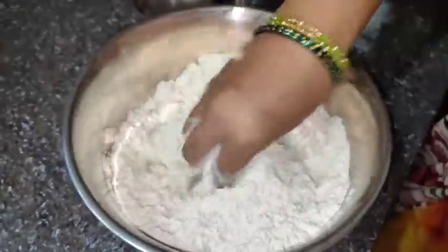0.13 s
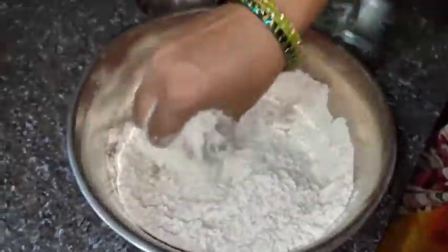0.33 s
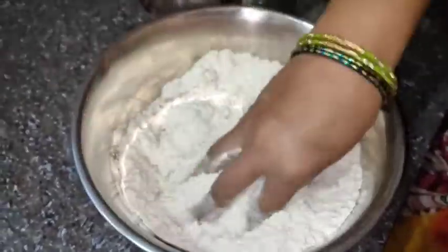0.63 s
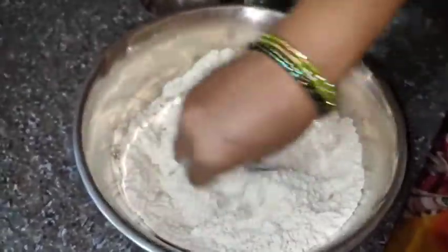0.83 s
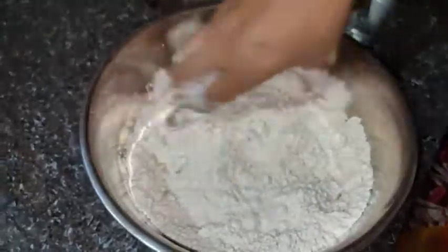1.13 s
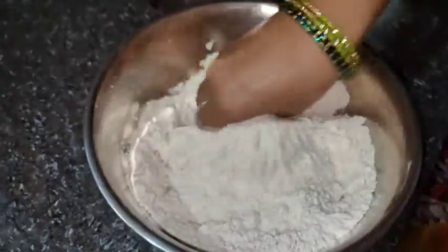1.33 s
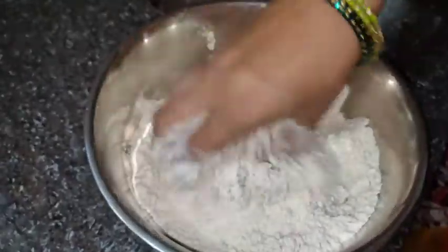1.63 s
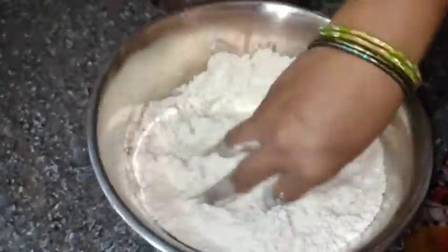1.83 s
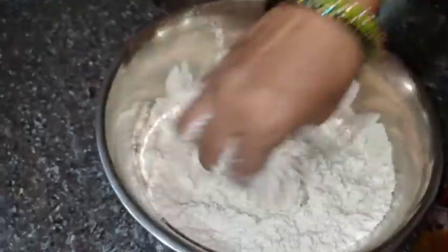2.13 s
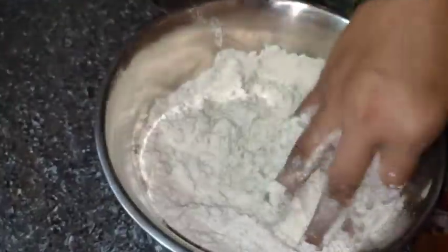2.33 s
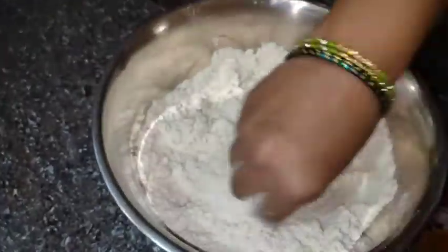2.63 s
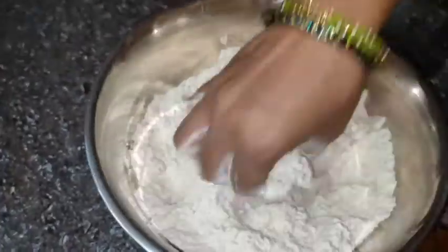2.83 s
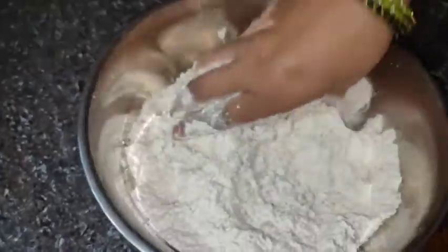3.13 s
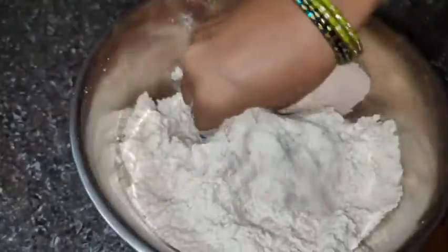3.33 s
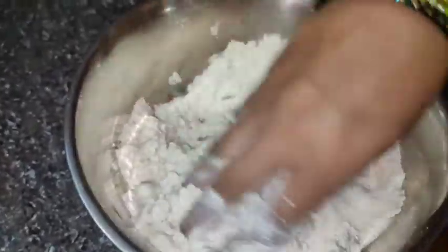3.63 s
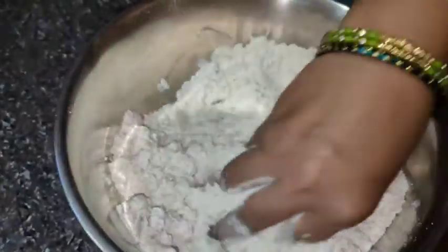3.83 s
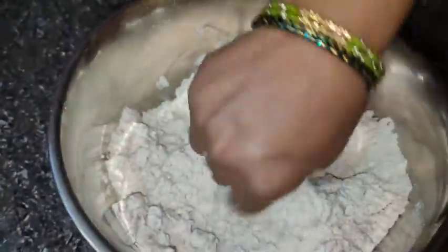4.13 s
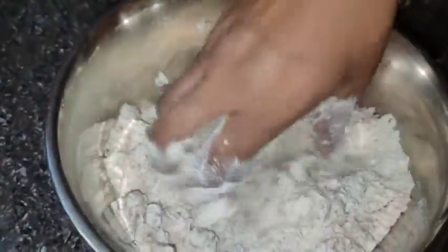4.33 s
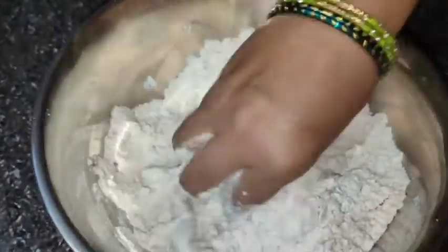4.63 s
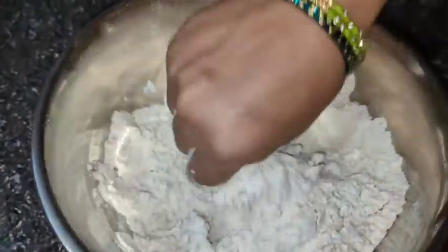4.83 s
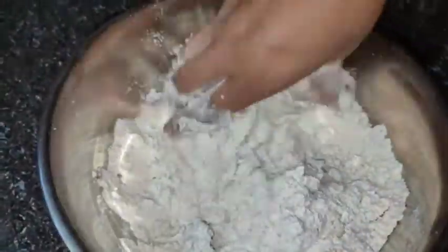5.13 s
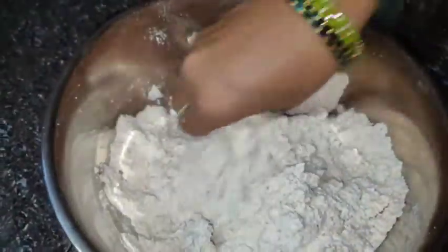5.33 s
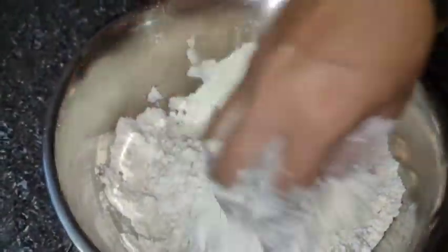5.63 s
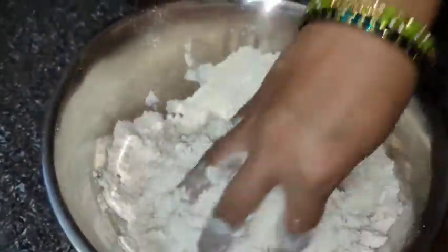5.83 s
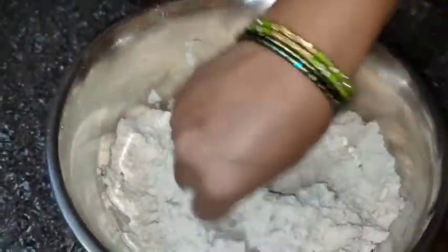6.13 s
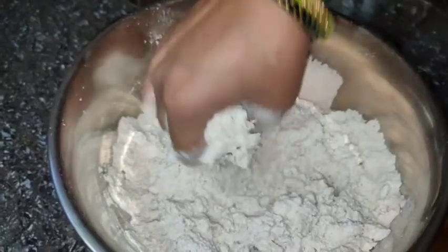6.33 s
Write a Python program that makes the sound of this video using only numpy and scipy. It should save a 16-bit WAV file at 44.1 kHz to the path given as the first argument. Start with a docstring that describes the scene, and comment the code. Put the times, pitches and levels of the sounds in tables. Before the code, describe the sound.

A hand works dry flour in a steel bowl, making a faint rustle with each stroke. Every so often glass bangles on the wrist clink together and knock the rim in short, bright rattles that ring briefly, some with a soft thud on the bowl bottom. The loudest come near the middle. A fan hums low throughout, and a bird chirps faintly outside once. The microphone is close, in a hard-walled kitchen.

```python
"""Glass bangles clash on a wrist and knock the rim of a steel bowl as a hand kneads flour in it.
Each clash is a short rattle that rings the bangles and the bowl and fades in a hard kitchen.
The hand thuds softly on the bowl bottom, and the flour rustles with each stroke.
Behind it a fan hums on the orders of its shaft and a bird chirps faintly outside,
all heard through the two ports of a phone close to the bowl."""
import sys
import numpy as np
from scipy import signal
from scipy.fft import rfft, irfft
from scipy.io import wavfile
from scipy.ndimage import uniform_filter1d

SR = 44100
rng = np.random.default_rng(int(sys.argv[2]) if len(sys.argv) > 2 else 0)


def put_to_file(sound):
    """Save the sound as 16-bit audio at rate SR, in the file named by the first command-line argument."""
    columns = np.atleast_2d(sound).T  # one column per channel
    safe = np.clip(columns, -1, 1)
    whole_steps = np.round(safe * 32767)
    wavfile.write(sys.argv[1], SR, whole_steps.astype(np.int16))


N = 285581
T = np.arange(N) / SR
HZ = np.arange(N // 2 + 1) * SR / N


def clashes(tap_count=5, rattle_s=.004, bounce_s=.005, scatter_db=3.5):
    """Glass hits glass and steel in a few fading taps, each waking the modes in a new mix."""
    # clashes: t/s, relative level/dB, favoured bangle f/Hz, bowl trim/dB, favoured bowl f/Hz,
    # knock trim/dB, favoured knock f/Hz
    hits = [(0.6263, -30, 6400, -23.5, 2440, -12.5, 2050), (.645, -30, 6420, -25.5, 3850, -12, 1500),
            (1.226, -19, 6560, -24.5, 3930, -22, 1400), (1.243, -23, 6200, -21.5, 4480, -21, 1000),
            (1.256, -27, 6000, -17, 3900, -29.5, 1000), (1.273, -35.5, 6800, -18, 3500, -30.5, 900),
            (1.292, -43.5, 6170, -13, 3460, -26, 900), (2.298, -52, 6230, -34, 2640, -31, 800),
            (2.4089, -14, 6880, -19, 4220, -20.5, 1220), (2.4161, -15.5, 6060, -17.5, 3270, -22, 780),
            (2.44, -27, 6730, -14, 3930, -19.5, 720), (2.453, -30, 6940, -14, 4850, -28, 470),
            (2.465, -29, 5840, -19, 3930, -18, 480), (2.485, -21, 6060, -18.5, 3760, -26.5, 680),
            (2.525, -30, 6530, -20, 3930, -16.5, 624), (2.58, -37.5, 6250, -20, 3160, -27, 663),
            (2.622, -36.5, 7650, -16, 3830, -23, 490), (3.036, -48.5, 6340, -31, 4900, -27, 770),
            (3.1057, -14.5, 6020, -22.5, 4400, -21, 880), (3.113, -22, 6200, -26.5, 4330, -15, 800),
            (3.14, -39.5, 6380, -15, 3100, -19, 482), (3.171, -40.5, 6200, -15, 4030, -26, 880),
            (3.199, -40, 6300, -15, 3900, -25.5, 472), (3.249, -50, 7200, -12, 4400, -37, 490),
            (3.7444, -27, 6530, -14.5, 4280, -14.5, 688), (3.755, -33, 7400, -20.5, 4360, -13, 1570),
            (3.773, -42, 6300, -10, 4280, -2.5, 1490), (5.053, -61.5, 7400, -22, 2800, -25, 800),
            (5.086, -54.5, 7500, -31, 3080, -27, 790), (5.1952, -21.5, 6580, -16, 3990, -19.5, 1100),
            (5.2352, -28.5, 5830, -11.5, 2520, -17.5, 1200), (5.28, -52.5, 6170, -9, 4580, -33, 900)]
    # modes of the glass bangles: f/Hz, level/dB, t60/s
    bangle_modes = [(5455, -22, 0.02), (5870, -12.5, 0.011), (5822, -0.5, 0.022), (5870, -5.5, 0.028),
                    (6100, -0.5, 0.051), (6360, -12, 0.066), (6725, -4.5, 0.018), (6560, -5, .05),
                    (6700, -18, 0.01), (6470, -1, 0.027), (7280, -3, 0.043), (7500, -4.5, 0.022),
                    (7420, -1, 0.045), (6900, 4, .03), (7480, 0.5, 0.024), (7487, 2, 0.041),
                    (8090, -2, 0.019), (7500, -8, 0.028), (8770, -14.5, 0.0085)]
    # bright modes of the steel bowl: f/Hz, level/dB, t60/s
    bowl_modes = [(2640, -3, .12), (2767, -3, .12), (2930, -9, .08), (3106, -2, .16), (3155, -4, .14),
                  (3330, -12, .05), (3510, -6, .11), (3630, -9, .08), (3760, -12, .05), (3932, -3, .12),
                  (4060, -10, .06), (4225, -3, .18), (4320, -8, .09), (4445, -4, .16), (4645, -5, .15),
                  (4840, -5, .14), (4985, -9, .08), (5250, -11, .05)]
    # the bowl's low, flour-damped modes: f/Hz, level/dB, t60/s
    knock_modes = [(442, 2.5, 0.037), (742, 3.5, 0.016), (802, -6, .03), (976, 0, 0.023), (1160, -4, 0.018),
                   (1510, -4, 0.02), (1834, -7, 0.013), (2220, -4, 0.013)]
    # every clash bounces once, softer and leaning more on the bowl
    bounces = np.array(hits) + [bounce_s, -4.5, 0, 2.5, 0, 0, 0]
    bounces[:, 0] += .4 * bounce_s * rng.standard_normal(len(hits))
    start, hit_db, glass_hz, bowl_db, bowl_hz, knock_db, knock_hz = np.concatenate([hits, bounces]).T
    lateness = np.cumsum(rng.exponential(1, (len(start), tap_count)), axis=1)
    lateness = (lateness - lateness[:, :1]) / tap_count
    at = ((start[:, None] + lateness * rattle_s) * SR).astype(int)
    force = undb(hit_db[:, None] - 10.7 * lateness - 13.5)

    def strike(modes, favoured_hz, trim_db, width_oct, boost_db):
        """Each tap shares its energy among the modes; those near the favoured pitch ring most."""
        draws = rng.standard_normal((len(start), len(modes), tap_count, 4))
        scatter, phase, *port_phases = draws.transpose(3, 1, 0, 2)
        detune = np.log2(np.array(modes)[:, :1] / favoured_hz) / width_oct
        share = undb(scatter_db * scatter + boost_db * np.exp(-detune ** 2)[:, :, None])
        share /= np.sqrt(np.mean(share ** 2, axis=0))
        strength = force * undb(trim_db)[..., None] * share
        # a mode radiates unevenly, so each port hears it with its own phase
        gains = [strength * np.exp(9j * phase + 1.2j * own) for own in port_phases]
        return ring(modes, at, np.stack(gains, 1))

    polarity = rng.choice([-1., 1.], (len(start), tap_count, 2))
    contact = np.array([taps(at, force * polarity[..., port]) for port in range(2)])
    crack = undb(16.5) * band(band(contact, 5900, 2200), 5900, 2600)
    crack += undb(-9) * band(band(contact, 3800, 2500), 3800, 3000)
    knock = strike(knock_modes, knock_hz, knock_db + 7.5, width_oct=.4, boost_db=11)
    glass = strike(bangle_modes, glass_hz, 0, width_oct=.1, boost_db=9.5)
    steel = strike(bowl_modes, bowl_hz, bowl_db + 3.5, width_oct=.11, boost_db=11.5)
    return glass + steel + crack + band(knock, 1100, 2500)


def ring(modes, at, gains):
    """Taps ring each mode as a dying sine; gains has shape (modes, ports, clashes, taps)."""
    out = np.zeros((2, N))
    for (hz, db, t60), gain in zip(modes, gains):
        pole = np.exp(2j * np.pi * hz / SR - np.log(1000) / (t60 * SR))
        for port in range(2):
            out[port] += undb(db) * signal.lfilter([1], [1, -pole], taps(at, gain[port])).imag
    return out


def thuds():
    """Soft pushes ring the bowl bottom and the counter for a moment."""
    # blows of the hand on the bowl bottom: t/s, relative level/dB
    blows = [(1.235, -56), (2.413, -38.5), (2.472, -44.5), (3.106, -34.5), (3.748, -47), (4.467, -42),
             (4.477, -43)]
    start, db = np.transpose(blows)
    impulses = taps((start * SR).astype(int), undb(db + 11.5))
    push = np.convolve(impulses, np.hanning(70))[:N]
    return band(push, 185, 70.1) + undb(-3) * band(push, 300, 150) + undb(-4) * band(push, 45, 54)


def flour():
    """Dense grains slide on steel: a fine hiss and a coarser rustle, each with a quick flicker."""
    # strokes of the hand through the flour: t/s, length/s, hiss level/dB, rustle level/dB
    strokes = [(-.05, 0.45, -64.5, -67.5), (0.17, 0.16, -89, -72), (0.326, 0.24, -70.5, -67.5),
               (0.519, 0.31, -61.5, -67), (0.798, 0.35, -68, -66), (1.07, 0.58, -66, -79),
               (1.572, 0.22, -69, -85), (1.776, 0.24, -66, -80), (2.064, 0.13, -77, -91),
               (2.282, .6, -62, -78.5), (3.02, 0.44, -61, -71.5), (3.579, 0.55, -67.5, -75),
               (4.075, 0.3, -77.5, -75.5), (4.31, 0.46, -69, -79.5), (4.542, 0.28, -68.5, -79),
               (4.863, 0.15, -75.5, -92), (5.049, 0.49, -64, -81.5), (5.784, 0.4, -67.5, -80),
               (6.22, .18, -74, -92), (6.41, .15, -73, -95)]
    resting = undb([-86, -88])[:, None]
    kneading = sum(undb(db)[:, None] * swell(start, length, rise=.22, fall_db=15.5)
                   for start, length, *db in strokes)
    hiss_gain, rustle_gain = resting + kneading
    grains = rng.standard_normal((2, 2, N)) * undb(2 * rng.exponential(1, (2, 2, N)))
    hiss = signal.sosfilt(signal.butter(3, [5950, 8100], "band", fs=SR, output="sos"), grains[0])
    hiss = level(hiss, 0) * hiss_gain * undb(.83 * walk(12))
    rustle = band(band(grains[1], 2300, 1300), 3100, 2200)
    rustle = level(rustle, 0) * rustle_gain * undb(2.1 * walk(26))
    return hiss + rustle


def kitchen(x, t60_s=.41, echo_db=-3.5):
    """Dense echoes off hard walls, unrelated at the two ports."""
    t = T[:int(.7 * SR)]
    tail = rng.standard_normal((2, len(t))) * undb(-60 * t / t60_s) * (1 - np.exp(-t / .002))
    tail /= np.sqrt(np.sum(tail[0] ** 2))
    return undb(echo_db) * signal.fftconvolve(x, tail, axes=1)[:, :N]


def fan(shaft_hz=11.068, blades=4, left_lag_samples=13):
    """The shaft hums on its wavering orders, over rushing air and a ringing housing."""
    # partials of the hum: multiple of the shaft rate, level/dB
    orders = [(6, -70), (8, -62), (10, -52.5), (11, -66), (12, -64.5), (14, -63.5), (16, -82.5),
              (17, -59.5), (18, -75.5), (19, -77), (21, -73.5), (26, -67.5), (29, -69), (30, -68),
              (32, -60.5), (35, -74), (39, -78.5), (40, -73.5), (42, -75), (44, -67.5), (46, -74.5),
              (48, -70.5), (50, -71), (56, -73)]
    # slow rise and fall of the hum: t/s, relative level/dB
    contour = [(0.0, -55.5), (1.8, -55.5), (2.299, -56), (2.63, -53), (2.901, -57), (3.209, -51.5),
               (3.49, -57), (3.87, -54.5), (4.29, -56.5), (4.5, -55.5), (6.47, -55.5)]
    times, contour_db = np.transpose(contour)
    angle = 2 * np.pi * shaft_hz * T + .016 * walk(1.5)
    hum = sum(undb(db + walk(3.7)) * np.cos(k * angle + .02025 * k ** 2) for k, db in orders)
    hum *= undb(np.interp(T, times, contour_db - contour_db.mean()))
    left, right = hum + fan_air(blades * angle) + fan_housing()
    return np.array([np.roll(left, left_lag_samples), right])


def fan_air(blade_phase):
    """Air rushes from the fan, and each blade pushes a puff."""
    # spectrum of the rush: f/Hz, relative level/dB
    spectrum = [(15, -55.5), (25, -13.5), (43, -17), (114, -3.5), (242, -12.5), (347, -14.5), (487, -11.5),
                (751, -18), (980, -23), (1340, -38.5), (4590, -41), (6920, -34), (8000, -42),
                (10400, -80.5), (17600, -120)]
    # stereo likeness of the rush: f/Hz, share of power common to both ports
    likeness = [(30, .6), (100, 0.99), (350, 0.78), (700, 0.53), (1200, 0.072), (2500, 0.14)]
    shared = over_hz(likeness)
    common, *own = rfft(rng.standard_normal((3, N)))
    noise = np.sqrt(shared) * common + np.sqrt(1 - shared) * np.array(own)
    rush = irfft(undb(over_hz(spectrum)) * noise, N)
    return level(rush * (1 + .061 * np.cos(blade_phase)), -54.5)


def fan_housing(ring_width_hz=11):
    """The housing resonates unsteadily, and now and then a narrow ring swells in the hum."""
    # housing resonances: f/Hz, width/Hz, level/dB
    resonances = [(1470, 110, -83.5), (686, 12, -79), (800, 42, -84), (979, 20, -75), (1209, 34, -81)]
    # passing rings: centre t/s, half length/s, f/Hz, level/dB
    rings = [(0.032, 0.071, 1015, -59.5), (0.472, 0.16, 1211, -73), (0.845, 0.057, 986, -63),
             (1.14, 0.092, 976, -71), (1.699, 0.034, 976, -60.5), (2.168, 0.066, 974, -69),
             (3.405, 0.062, 990, -69), (3.715, 0.031, 946, -57.5), (4.64, 0.052, 974, -68),
             (4.977, 0.1, 956, -62.5), (5.49, 0.084, 976, -72), (5.82, 0.12, 987, -66.5),
             (6.384, .1, 970, -71)]
    out = np.zeros((2, N))
    for hz, width, db in resonances:
        resonance = band(rng.standard_normal((2, N)), hz, width)
        out += level(resonance, db) * undb(6.1 * walk(11))
    for centre, half_length, hz, db in rings:
        narrow = band(rng.standard_normal((2, N)), hz, ring_width_hz)
        out += level(narrow, db) * np.exp(-((T - centre) / half_length) ** 2)
    return out


def bird(glide_share=.22):
    """Two faint rising whistles, unsteady in pitch and strength after the long way in."""
    # calls: t/s, length/s, first f/Hz, last f/Hz, level/dB
    calls = [(4.053, 0.19, 2540, 3440, -68), (4.235, .06, 2620, 3070, -69)]
    out = np.zeros(N)
    for start, length, first_hz, last_hz, db in calls:
        glide = np.exp(-np.maximum(T - start, 0) / (glide_share * length))
        pitch = (last_hz + (first_hz - last_hz) * glide) * (1 + .058 * walk(300))
        gain = swell(start, length, rise=.3, fall_db=20) * undb(db + 4.6 * walk(82))
        out += gain * np.sin(2 * np.pi * np.cumsum(pitch) / SR)
    return out


def undb(db):
    """Decibels to gain."""
    return 10 ** (np.asarray(db) / 20)


def level(x, db):
    """Scale to an rms level."""
    return x * undb(db) / np.sqrt(np.mean(x ** 2))


def over_hz(table):
    """A curve of (f/Hz, value) points read at every frequency, straight on a log axis."""
    hz, value = np.transpose(table)
    return np.interp(np.log(HZ + 1), np.log(hz + 1), value)


def band(x, hz, width):
    """Two-pole resonance, gain 1 at the centre."""
    return signal.lfilter(*signal.iirpeak(hz, hz / width, SR), x)


def walk(rate):
    """Smooth drift: random values held 1 / rate s and slewed twice."""
    hold = int(SR / rate)
    steps = np.repeat(rng.standard_normal(N // hold + 1), hold)
    return .78 * uniform_filter1d(uniform_filter1d(steps, hold), hold)[:N]


def taps(at, gain):
    """Impulses of the given gains at the given samples."""
    x = np.zeros(N, gain.dtype)
    np.add.at(x, np.minimum(at, N - 1).ravel(), gain.ravel())
    return x


def swell(start, length, rise, fall_db):
    """Envelope that rises over a share of the length, then fades by fall_db and stops."""
    progress = (T - start) / length
    attack = np.clip(progress / rise, 0, 1)
    fade = undb(-fall_db * np.clip((progress - rise) / (1 - rise), 0, 1) ** 2)
    release = np.clip((1 - progress) * 10, 0, 1)
    return attack * fade * release


def scene():
    """Clashes, thuds and bird echo in the kitchen, over dry flour and the steady fan."""
    events = clashes() + thuds() + bird()
    return events + kitchen(events) + flour() + fan()


def record(dry, top_hz=7900):
    """The phone's two ports colour the sound in opposite ways; the top is cut."""
    # balance between the ports: f/Hz, left minus right level/dB
    balance = [(60, 4.5), (340, 5), (600, -1), (1000, -4.5), (1400, -6.5), (1750, -11.5), (2100, -5),
               (2600, 1), (3800, 3), (5200, 6), (5900, 8), (6550, 13.5), (7250, 6.5), (8000, 3)]
    tilt_db = over_hz(balance) / 2
    coloured = irfft(rfft(dry) * undb([tilt_db, -tilt_db]), N)
    return signal.sosfilt(signal.ellip(9, .5, 60, top_hz, fs=SR, output="sos"), coloured)


dry = scene()
out = record(dry)
put_to_file(out)
```